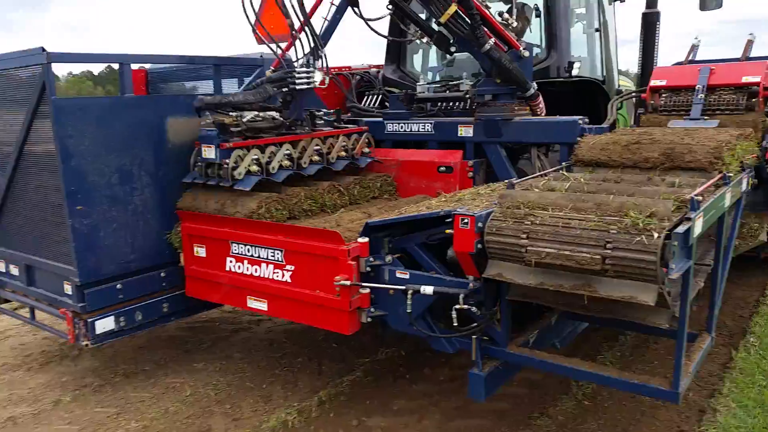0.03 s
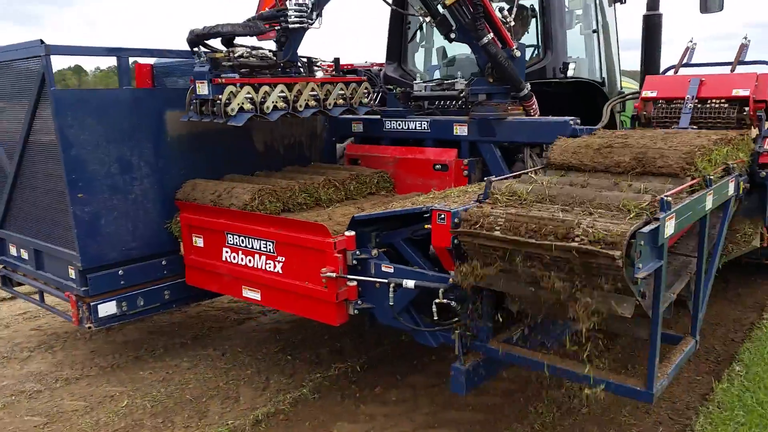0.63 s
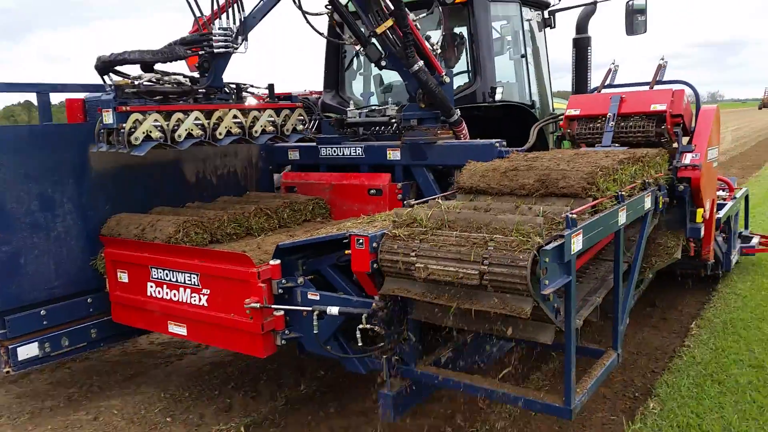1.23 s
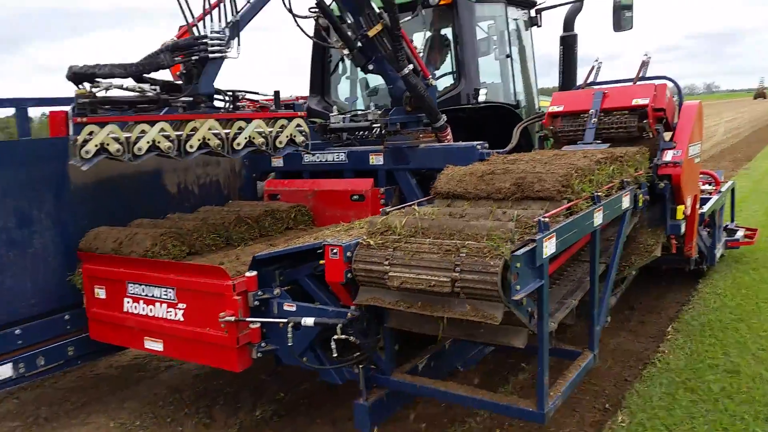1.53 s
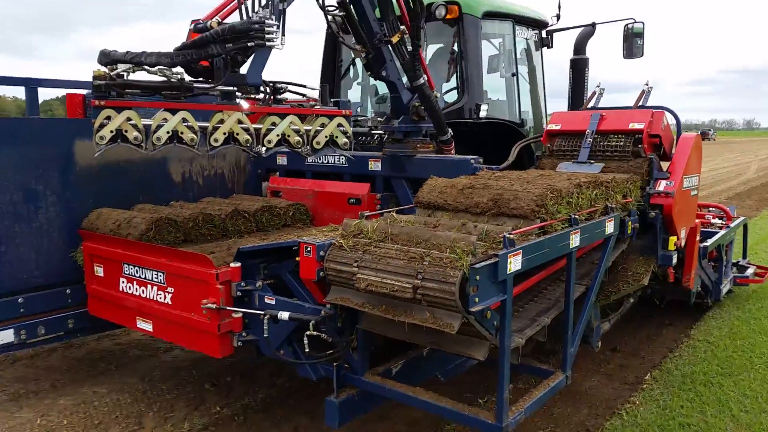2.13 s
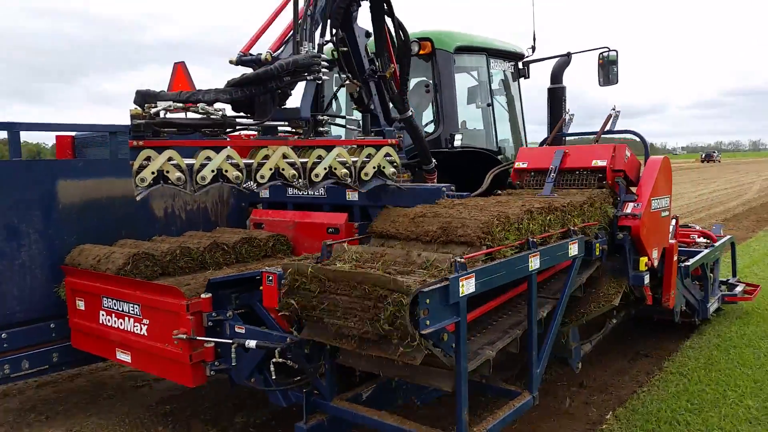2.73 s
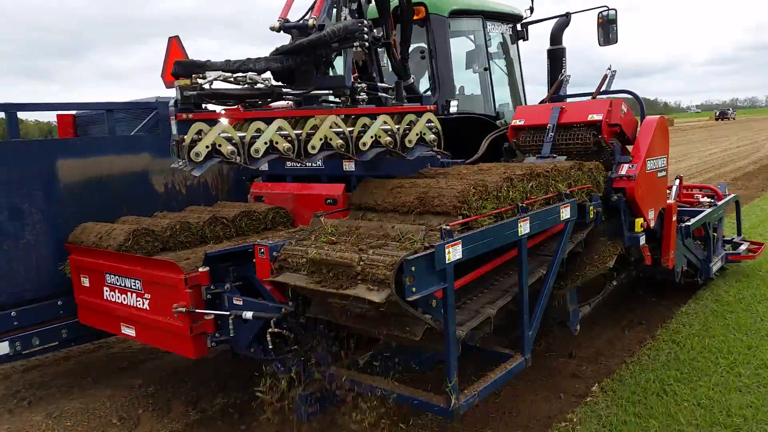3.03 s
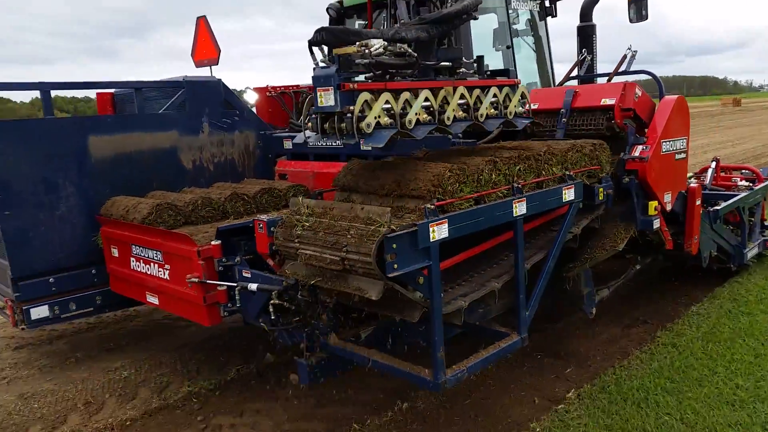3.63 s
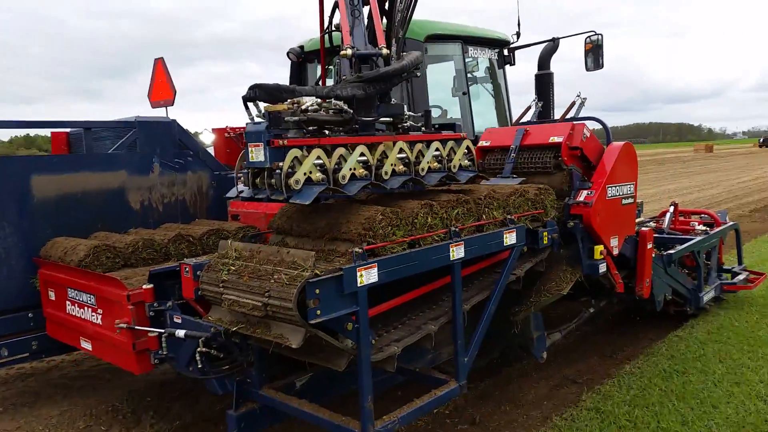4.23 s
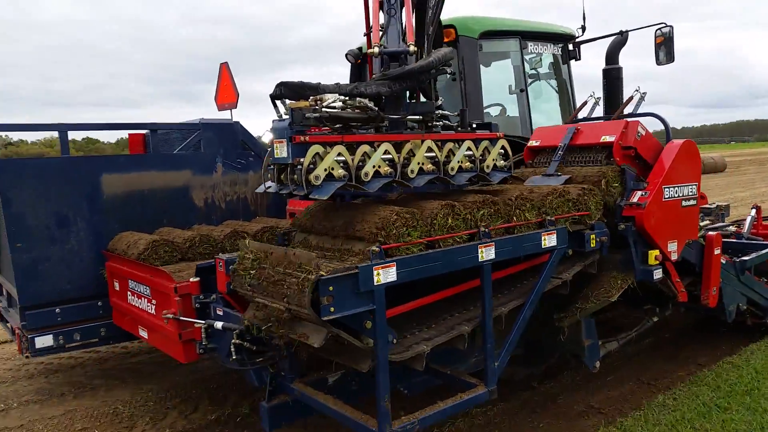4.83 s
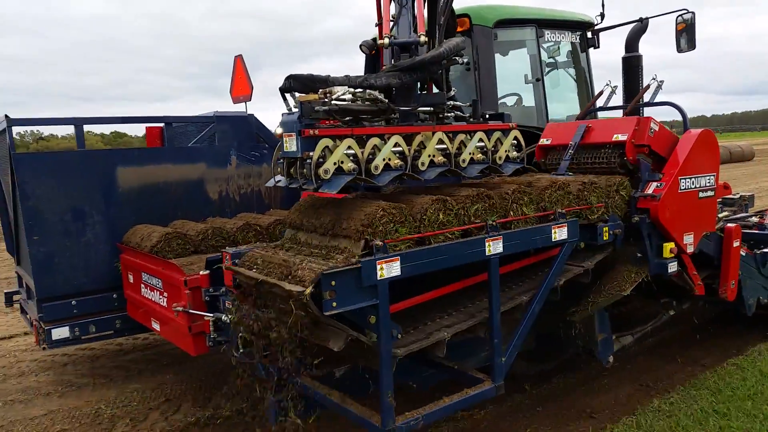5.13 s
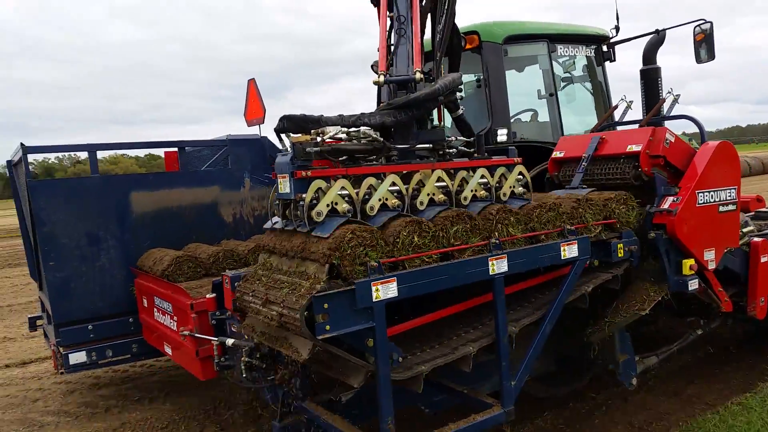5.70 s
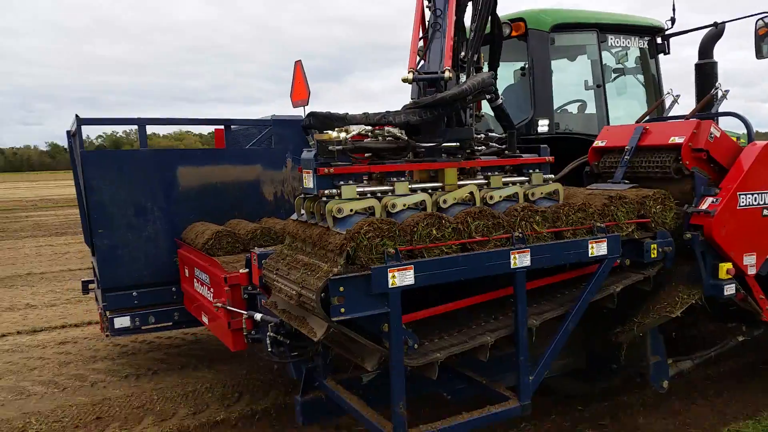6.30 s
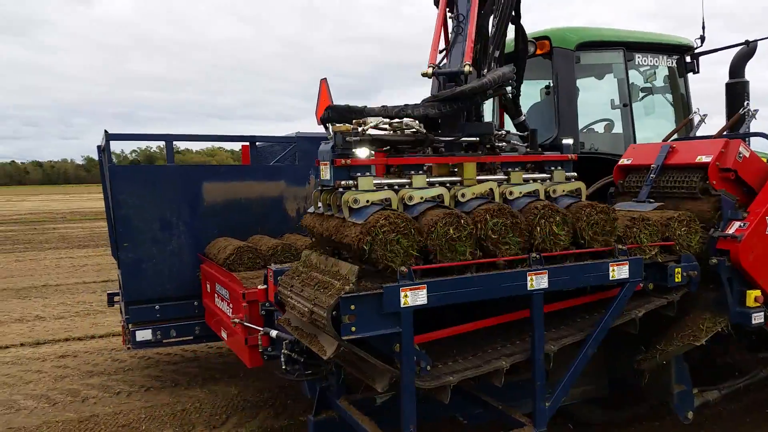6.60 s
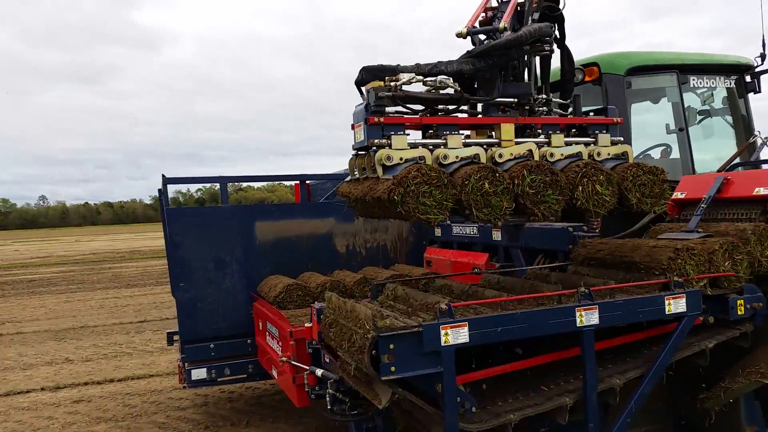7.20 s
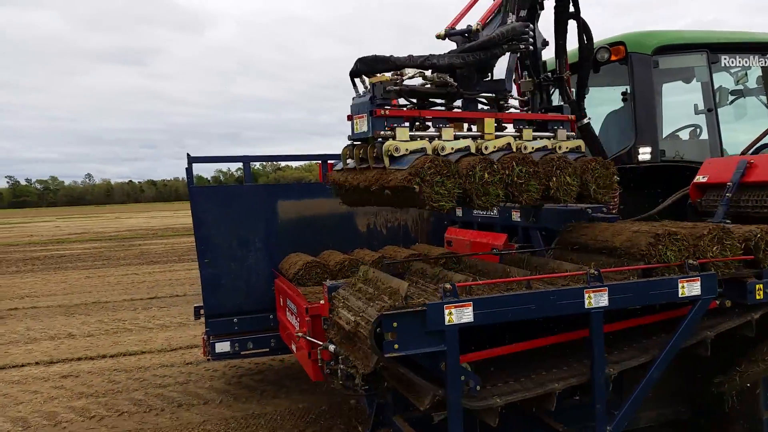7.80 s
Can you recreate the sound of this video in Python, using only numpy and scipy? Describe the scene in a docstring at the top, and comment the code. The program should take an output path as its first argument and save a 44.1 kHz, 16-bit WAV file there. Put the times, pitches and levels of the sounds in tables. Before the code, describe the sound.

A tractor-mounted sod harvester runs in an open field, a few metres from stereo microphones. It opens with a low diesel drone and a steel clank. At about 1 second the din swells: steady engine, pump hum with a thin whine, and a rumbling, rattling, hissing conveyor. The stacking arm clanks irregularly, with short high squeaks and gritty scrapes. Sod rolls thud on a sheet-steel table at about 2.7 and 4.7 seconds, and faint valve tones sound between 3 and 4. From 4.5 seconds a chain ticks in quick runs while the table booms softly. Light wind bumps the microphones twice. At 6.3 seconds everything sinks suddenly around a brief, very high squeal on the right and a sharp clank. Faint soil patter, a soft thud and light ticks follow. From about 7.5 seconds the drone, rattle and clanks return until the end at 8.

```python
"""A diesel drone and a steel clank open the scene: a sod harvester on a tractor, in an open field,
a few metres from a stereo pair of microphones. The engine holds governed speed under its pump's hum.
The conveyor rumbles and rattles, its chain ticks over a sprocket, sod rolls thud on a sheet-steel table
and the stacking arm clanks and squeaks. The whole din swells after a second, sinks suddenly around
a thin squeal, and comes back near the end."""
import sys
import numpy as np
from scipy import signal
from scipy.fft import rfft, irfft, next_fast_len
from scipy.io import wavfile
from scipy.ndimage import map_coordinates

SR = 44100
rng = np.random.default_rng(int(sys.argv[2]) if len(sys.argv) > 2 else 0)


def store_wav(level_fs):
    """Save 16-bit WAV to argv[1]."""
    pcm = np.round(np.clip(np.atleast_2d(level_fs), -1, 1) * 32767)
    wavfile.write(sys.argv[1], SR, pcm.T.astype(np.int16))


N = 350595

# wind on the microphones, spills of soil, the table under load: (middle [s], length [s], level [dB])
WIND_PUFFS = [(2.61, .09, -24), (5.8, .16, -28)]
SOIL_SPILLS = [(6.76, .14, -42), (6.84, .06, -47), (6.91, .07, -46), (7.12, .07, -44), (7.26, .2, -47)]
TABLE_LOADED = [(5.3, 1.6, -29)]
# noise spectra of the machine's parts: (frequency [Hz], relative density [dB])
CRUMB_SPECTRUM = [(450, -20), (950, 0), (1700, -2), (2900, -6), (4500, -13), (9000, -24)]
BOOM_SPECTRUM = [(200, -54), (320, 4), (395, 0), (480, -1.5), (580, -17), (1000, -61)]
TICK_SPECTRUM = [(3000, -68), (6300, -17), (7600, 6), (9300, 5), (11000, 12.5), (12500, 13), (14500, -0.5)]
RUMBLE_SPECTRUM = [(20, -30), (32, -11), (45, -12), (85, 2), (130, -3), (190, -3), (260, -2.5), (340, -4),
                   (480, -10), (560, -18), (800, -13.5), (1500, -39)]
RATTLE_SPECTRUM = [(250, -19), (520, 0), (720, -2), (950, 4), (1200, -0.5), (1900, -4.5), (2900, -7),
                   (3600, -21), (4800, -17.5), (5800, -19), (8000, -18), (14000, -54)]
HISS_SPECTRUM = [(2000, 8), (4000, 0.5), (5700, -9), (6800, -3), (8000, 2), (9500, 0), (11000, 2.5),
                 (12800, 7.5), (13700, 5), (14600, -0.5)]
KNOCK_SPECTRUM = [(250, -30), (400, 0), (560, -5), (720, -4), (950, 0), (1300, -3), (2000, -8), (3500, -25),
                  (6000, -50)]
# whine, hiss, rattle and drone as heard, swelling and sinking: (time [s], level [dB])
WHINE_LEVEL = [(0, -47), (.7, -58), (.95, -41), (1.3, -41), (1.7, -49), (3.1, -45), (3.6, -41.5),
               (4.2, -45), (5.2, -38), (6.15, -45), (6.35, -60), (7.3, -55), (7.7, -47)]
HISS_LEVEL = [(0, -37.5), (.6, -41.5), (.9, -34), (1.1, -28), (1.9, -31), (2.6, -25), (3.8, -26),
              (4.05, -32), (4.6, -26), (4.8, -20.5), (5.1, -25), (6.2, -25), (6.35, -39), (6.6, -44),
              (7.1, -40), (7.4, -37.5), (7.7, -25.5), (7.95, -26.5)]
RATTLE_LEVEL = [(0, -38.5), (.62, -42.5), (.78, -38.5), (.88, -35.5), (1.15, -31), (1.4, -31), (1.95, -31),
                (2.5, -30.5), (2.72, -26), (3.1, -30.5), (3.6, -29.5), (4.1, -34.5), (4.7, -30.5),
                (6.15, -28.5), (6.25, -33), (6.33, -46.5), (7.35, -43), (7.6, -31.5), (7.95, -31.5)]
DRONE_LEVEL = [(0, -34), (.86, -29.5), (.95, -22), (1.2, -17.5), (1.6, -20), (2.7, -21.5), (3.15, -18.3),
               (3.8, -22), (4.2, -26.5), (4.7, -21.5), (5.35, -20.5), (6.1, -20.5), (6.25, -24.5),
               (6.34, -39.5), (7.3, -36), (7.6, -25.5), (7.8, -25.5), (7.95, -23)]
# singing valves, drags over steel, dry pivots: (middle [s], length [s], pitch [Hz], relative level [dB])
VALVE_TONES = [(3.3, 0.81, 657, -40), (3.85, .6, 897, -42.5)]
DRAGS = [(2.655, 0.074, 760, -26), (2.81, .07, 1850, -31), (2.865, .04, 850, -28),
         (2.906, 0.058, 1710, -25.5), (2.932, .035, 810, -29), (3.19, .1, 1700, -33.5),
         (3.265, .04, 1950, -28), (3.45, .025, 856, -27.5), (3.56, .09, 800, -30),
         (4.307, 0.05, 2300, -27.5), (4.565, .05, 1500, -29.5), (4.81, .12, 1900, -45),
         (5.025, .03, 980, -29), (5.06, .07, 1750, -31), (5.522, .04, 2300, -28)]
PIVOT_SQUEAKS = [(1.38, .049, 6200, -37), (1.396, .065, 12700, -31), (1.769, .055, 5740, -39),
                 (2.032, .029, 7780, -37), (2.516, .07, 6160, -37.5), (4.114, .04, 9350, -41),
                 (4.146, .027, 9550, -36), (4.384, .042, 5630, -41), (4.827, .07, 12750, -29),
                 (5.881, .028, 5500, -34), (5.923, .035, 5520, -41), (6.213, .022, 5520, -30),
                 (6.225, .013, 5560, -22.5), (6.241, .02, 5500, -40)]
# the gripper closing: (start [s], end [s], first pitch [Hz], last pitch [Hz], level [dB])
GRIPPER_CHIRPS = [(6.268, 6.332, 13050, 13500, -28), (6.295, 6.318, 12250, 12400, -33),
                  (6.315, 6.336, 14150, 14400, -18), (6.336, 6.358, 13800, 14450, -17),
                  (6.355, 6.385, 14200, 14050, -19), (6.362, 6.394, 13000, 12850, -27),
                  (6.370, 6.392, 10600, 10650, -34), (6.370, 6.392, 9720, 9760, -36),
                  (6.385, 6.412, 14000, 14130, -12), (6.405, 6.430, 14200, 14520, -17)]
# runs of chain ticks: (first [s], last [s], ticks [count], level [dB], loudest point [share of run],
# left-right [dB])
TICK_RUNS = [(4.471, 4.558, 3, -21.5, 0.44, 4), (4.795, 5.009, 6, -23.5, 0.35, -2),
             (5.169, 5.376, 6, -19, 0, 0), (5.538, 5.705, 5, -15.5, 0.84, 2), (5.747, 5.747, 1, -23, 0, 2),
             (5.9365, 5.9365, 1, -19.5, 0, -2), (6.671, 7.018, 8, -36.5, .6, -11),
             (7.058, 7.235, 5, -29.5, 1, -6), (7.432, 7.515, 3, -27, 0.95, -9),
             (7.635, 7.676, 2, -23.5, 0.76, -9), (7.76, 7.917, 5, -25, 0.52, -8)]
# sod rolls landing: (time [s], level [dB], pitch [Hz], relative slap [dB], t60 [s])
ROLL_LANDINGS = [(2.718, -14, 295, -5, .07), (2.728, -14, 320, -3, .08), (4.706, -10, 310, -6, .055),
                 (6.783, -27, 330, -14, .09)]
# modes of the sheet-steel table: (frequency [multiple of the pitch], level [dB])
TABLE_MODES = [(1, 0), (1.5, -7), (2.45, -11), (3, -11), (4.4, -19)]
# where the conveyor sits between the microphones: (time [s], rattle left-right [dB], hiss left-right [dB])
CONVEYOR_BEARING = [(0, -1.5, -5), (2.4, -2.5, -5), (3.2, -2.5, 0), (4.3, -1, 2.5), (5.1, -0.5, 2),
                    (6.1, 4, 1), (6.5, 8, -1.5), (7.95, 15, -3)]
# how the two microphones colour the conveyor: (frequency [Hz], left-right [dB])
MIC_SHADING = [(60, -0.5), (150, 2), (320, 7.5), (600, 3.5), (1000, 6), (1500, 5), (2500, 2.5),
               (4500, -6.5), (7000, 9), (9000, 22), (11000, -5), (13000, -7.5)]
# steel knocking on steel: (time [s], level [dB], pitch of the struck spot [Hz], relative body [dB],
# body pitch [Hz], relative treble [dB], t60 [s], left-right [dB])
ARM_BLOWS = [(0.017, -28.5, 3720, -14, 1800, -15, 0.28, -4), (0.068, -37, 4000, -10, 1800, -12, .14, -4),
             (0.370, -33, 4200, -12, 1800, -16, 0.13, -5), (1.097, -27.5, 3100, 3, 2300, -8, .16, -1),
             (1.375, -19.5, 5000, -5, 1500, -8, 0.16, -7), (1.4116, -25.5, 4450, -2, 1500, -7, .21, -3),
             (1.638, -38, 3000, 12, 1270, -14, .12, 2), (2.031, -24, 3000, 1, 1500, -7, .18, -4),
             (2.129, -21.5, 4500, -0.5, 1270, -18, .13, -3), (2.2925, -17.5, 4150, 2, 2800, -11, 0.19, -4),
             (2.515, -23.5, 5370, -16, 1800, -6, 0.22, -6), (2.536, -25.5, 4400, -18, 1800, -4, 0.17, -4),
             (2.63, -22, 3930, -16, 1800, -4.5, 0.16, -1), (3.001, -18, 5000, 1.5, 1700, -19, 0.11, -1),
             (3.352, -25.5, 2900, 6, 1800, -3, .13, 0), (3.519, -26.5, 3000, 2, 2600, -12, 0.14, 0),
             (3.6443, -14, 6700, -4, 970, -5, 0.12, 1), (3.674, -23, 4600, -4, 1500, -12, .12, -4),
             (3.793, -33, 3000, 10, 1900, -12, .1, 0), (4.733, -22.5, 3700, 5, 1400, -2, .17, 1),
             (4.9068, -24, 3020, -3, 1000, -1, .12, 2), (5.137, -23, 4100, 4, 1500, -14, 0.19, 2),
             (5.229, -21, 2880, 4, 1200, -3, .14, 2), (5.304, -20, 3600, 1.5, 950, -8, 0.098, 2),
             (5.404, -21, 3060, 9.5, 1800, -17, 0.11, 4), (5.9833, -14.5, 3750, 2.5, 930, -5, 0.14, 2),
             (6.012, -20, 2960, 2, 1000, -3, 0.21, 0), (6.098, -27.5, 3000, 8, 1700, -6, 0.12, 2),
             (6.1852, -25.5, 5000, -4, 1500, 1.5, 0.21, 6), (6.332, -30, 3870, -10, 1800, 5.5, .072, 3),
             (6.438, -17, 3300, -12, 2700, 3.5, 0.018, 2), (6.446, -26.5, 3100, -7, 2700, 3, 0.087, 5),
             (6.629, -37, 3050, -12, 1800, -14, .071, -1), (6.7322, -43, 2900, 13, 1300, -6, 0.2, 10),
             (6.8947, -36, 3800, 4, 1300, -2, .14, 3), (7.555, -26, 2700, 3, 1000, -17, .17, 0),
             (7.711, -16.5, 2600, 2, 2400, -15, 0.084, 3), (7.762, -25, 3300, -2, 950, 9, 0.03, 4),
             (7.8088, -19.5, 2850, 2.5, 2600, -20, 0.12, 0), (7.883, -25.5, 2860, -1, 1000, -3, .17, 1),
             (7.899, -21.5, 2860, 0, 2400, -10, 0.14, 3)]
# modes of the stacking arm: (frequency [Hz], width [Hz], level [dB])
ARM_MODES = [(2780, 470, 6.5), (3020, 77, 10), (3470, 290, -4.5), (3810, 230, -2.5), (4360, 170, 0.5),
             (5060, 52, 6.5), (5600, 120, -3.5), (6120, 90, 2.5), (6960, 170, 1.5), (7430, 280, -8),
             (12750, 90, 0)]
# modes of the frame under the arm: (frequency [Hz], level [dB], t60 [multiple of the blow's])
FRAME_MODES = [(928, -0.5, 1.2), (1034, -8, 1.1), (1257, -5.5, 1.3), (1680, -4, 1.3), (1884, -3.5, 1.5),
               (2020, -4, 1), (2670, 2, .9), (3120, 6, .9)]
# governed crankshaft: (time [s], speed [turns/s])
CRANK_SPEED = [(0, 26.41), (3.9, 26.4), (4.6, 26.25), (5, 26.52), (5.5, 26.41), (7.95, 26.37)]
# tones locked to the shaft: (order [multiple of crank speed], level [dB])
ENGINE_ORDERS = [(2, -10.5), (3, -24), (4, 0), (5, -23), (6, -9.5), (7, -18), (8, -7.5), (10, -21),
                 (16, -20)]
PUMP_ORDERS = [(9, 0), (11.35, -11), (18, -27), (36, -31), (40.3, -30)]
# the drone as heard ducks briefly, mostly at loud clanks: (time [s])
DRONE_DUCKS = [0.85, 1.08, 1.39, 1.95, 2.54, 3.65, 4.73, 5.98]
# the low drone throbs: (time [s], level change [dB])
DRONE_THROBS = [(2.67, -8), (2.84, -6), (2.93, 3), (3.01, -9), (5.33, 3), (5.43, -9), (5.52, 6), (5.60, -8),
                (7.70, -8)]


def amp(db):
    """Decibels to gain."""
    return 10 ** (np.asarray(db) / 20)


def unit(x):
    """Scale to rms 1."""
    return x / np.sqrt(np.mean(x ** 2) + 1e-20)


def along(points, hz):
    """Read (Hz, value) points on a log axis."""
    freqs, values = np.transpose(points)
    return np.interp(np.log(hz + 1), np.log(freqs + 1), values)


def curves(rows):
    """One value per sample for each column after the time."""
    times, *columns = np.transpose(rows)
    return [np.interp(np.arange(N) / SR, times, column) for column in columns]


def swells(rows):
    """Envelope of smooth humps from (middle [s], length [s], level [dB]) rows."""
    t = np.arange(N) / SR
    return sum(amp(db) * np.exp(-(2 * (t - s) / length) ** 2) for s, length, db in rows)


def wobble(rate):
    """A smooth random curve, rate knots a second."""
    knots = rng.standard_normal(int(N * rate / SR) + 4)
    fine = np.arange(0, len(knots) - 1, 1 / 8)
    return np.interp(np.arange(N) * rate / SR, fine, map_coordinates(knots, [fine]))


def filtered(x, response):
    """x times a response of frequency."""
    n = x.shape[-1]
    padded = next_fast_len(n + 4096, True)
    return irfft(rfft(x, padded) * response(np.fft.rfftfreq(padded, 1 / SR)), padded)[..., :n]


def coloured(x, spectrum):
    """x shaped by (Hz, dB) points, at rms 1."""
    return unit(filtered(x, lambda hz: amp(along(spectrum, hz))))


def panned(x, pan_db):
    """Left louder than right by pan_db, at constant power."""
    gains = np.array([amp(pan_db / 2), amp(-pan_db / 2)]).reshape(2, -1)
    return x * gains / np.sqrt(np.mean(gains ** 2, axis=0))


def arriving(x, lead_ms):
    """A direct sound that reaches the left microphone lead_ms before the right."""
    return filtered(x, lambda hz: np.exp(1j * np.pi * hz * lead_ms / 1000 * np.array([[1], [-1]])))


def noise_pair(alike, lead_ms):
    """White noise at the two microphones: a direct share and a scattered rest."""
    direct = arriving(rng.standard_normal(N), lead_ms)
    return np.sqrt(alike) * direct + np.sqrt(1 - alike) * rng.standard_normal((2, N))


def add(track, s, sound):
    """Mix a sound in at time s."""
    room = track[:, max(round(s * SR), 0):][:, :sound.shape[-1]]
    room += sound[..., :room.shape[-1]]


def jostle(rate, t60, spread_db):
    """Envelope of many small random contacts, each dying quickly."""
    blows = (rng.random(N) < rate / SR) * amp(spread_db * np.clip(rng.standard_normal(N), -2, 2))
    t = np.arange(SR // 8) / SR
    power = signal.fftconvolve(blows ** 2, amp(-60 * t / t60) ** 2)[:N]
    return unit(np.sqrt(np.abs(power)))


def noise_cycle():
    """One period of noise; repeated, it gives an even comb of lines."""
    return irfft(np.exp(2j * np.pi * rng.random(size=800)))


def hum(turns, orders, waver_db, drift):
    """Lines locked to the shaft; the higher ones waver more in level and phase."""
    lines = np.zeros(N)
    for order, db in orders:
        unsteady = max(1, order / 9)
        phase = 2 * np.pi * (order * turns + rng.random()) + unsteady * drift * wobble(12)
        lines += np.sqrt(2) * amp(db + unsteady * waver_db * wobble(9)) * np.sin(phase)
    return lines


def wind():
    """Light puffs bump each microphone port on its own."""
    spectrum = [(12, -18), (30, -9), (70, -12), (200, -45), (1000, -90)]
    return panned(swells(WIND_PUFFS) * coloured(rng.standard_normal((2, N)), spectrum), pan_db=6)


def soil():
    """Crumbs fall from the lifted rolls and patter on the conveyor."""
    patter = jostle(rate=260, t60=.014, spread_db=4) * noise_pair(alike=.45, lead_ms=-.2)
    return panned(swells(SOIL_SPILLS) * coloured(patter, CRUMB_SPECTRUM), pan_db=-1)


def hydraulics(turns, whine_order=27):
    """The pump whines thinly with the shaft; valves sing as the arm swings."""
    t = np.arange(N) / SR
    whine_db = curves(WHINE_LEVEL)[0] + wobble(8)
    whine = amp(whine_db) * np.sin(2 * np.pi * whine_order * turns + .2 * wobble(8))
    valves = sum(swells([(s, length, db)]) * np.sin(2 * np.pi * hz * t + .5 * wobble(15))
                 for s, length, hz, db in VALVE_TONES)
    return arriving(np.sqrt(2) * (whine + valves), lead_ms=-.1)


def table_boom(links_per_s=24.9, link_share=.55):
    """Under a full row of rolls the sheet-steel table booms, shaken alike by every link of the chain."""
    cycle = noise_cycle()
    links = np.arange(N) / SR * links_per_s + .02 * wobble(5)
    beat = unit(cycle[(links % 1 * len(cycle)).astype(int)])
    shaking = np.sqrt(link_share) * beat + np.sqrt(1 - link_share) * noise_pair(alike=1, lead_ms=-.065)
    load = swells(TABLE_LOADED) * amp(2.3 * wobble(18))
    return panned(load * coloured(shaking, BOOM_SPECTRUM), pan_db=8.5)


def scrapes(half_width_octaves=.25):
    """Sod and slats drag over steel: a cluster of coarse catches sounds around one pitch."""
    out, t = np.zeros((2, N)), np.arange(N) / SR
    grit = noise_pair(alike=.7, lead_ms=-.18) * jostle(rate=320, t60=.014, spread_db=4)
    for s, length, hz, db in DRAGS:
        near = np.abs(t - s) < length
        band = lambda f: amp(-6 * (np.log2((f + 1) / hz) / half_width_octaves) ** 2)
        drag = unit(filtered(grit[:, near], band))
        add(out, s - length, amp(db) * drag * np.exp(-(2 * (t[near] - s) / length) ** 2))
    return panned(out, pan_db=2)


def squeaks(pitch_stray=.016, scrape_db=-9):
    """Dry pivots stick and slip in short rough chirps with one overtone and a faint scrape."""
    out, t = np.zeros((2, N)), np.arange(N) / SR
    stray = np.cumsum(wobble(2500)) / SR
    grip = unit(amp(3.5 * wobble(260)))
    for s, length, hz, db in PIVOT_SQUEAKS:
        near = np.abs(t - s) < length / 2
        phase = 2 * np.pi * hz * (t[near] + pitch_stray * stray[near])
        tone = arriving(np.sin(phase) + amp(-5) * np.sin(2 * phase), lead_ms=-.2)
        scrape = unit(filtered(rng.standard_normal(tone.shape), lambda f: 1 / (1 + ((f - hz) / 900) ** 2)))
        swell = np.cos(np.pi * (t[near] - s) / length) * grip[near]
        add(out, s - length / 2, amp(db + 4) * swell * (tone + amp(scrape_db) * scrape))
    return out


def gripper_squeal(stray_hz=110, flutter_db=3):
    """Off to the right the gripper takes hold and slips in very high, fluttering chirps, most rising."""
    out = np.zeros((2, N))
    stray = 2 * np.pi * np.cumsum([stray_hz * wobble(900) for side in range(2)], axis=1) / SR
    flutter = amp(flutter_db * np.tanh(wobble(400)))
    for start, end, start_hz, end_hz, db in GRIPPER_CHIRPS:
        span = np.arange(round(start * SR), round(end * SR))
        phase = 2 * np.pi * np.cumsum(np.linspace(start_hz, end_hz, len(span))) / SR + stray[:, span]
        add(out, start, amp(db) * np.sqrt(np.hanning(len(span))) * flutter[span] * np.sin(phase))
    return panned(out, pan_db=-9)


def chain(sag_db=5.5, thin_below_db=-21, rebound_s=.014, rebound_db=-9):
    """Link after link scrapes onto the sprocket and rebounds; the frame scatters each tick."""
    out, t = np.zeros((2, N)), np.arange(SR // 10) / SR
    envelope = (1 - np.exp(-t / .0003)) * (np.exp(-(t / .0062) ** 4) + .27 * amp(-60 * t / .11))
    for first, last, links, peak_db, crest, pan_db in TICK_RUNS:
        for share in np.linspace(0, 1, round(links)):
            s = first + share * (last - first)
            db = peak_db - sag_db * (share - crest) ** 2 + rng.normal()
            # light ticks keep only their highest part
            thin_db = np.clip((thin_below_db - db) * 2, 0, 10)
            spectrum = [(hz, level - thin_db * (hz < 10000)) for hz, level in TICK_SPECTRUM]
            rebound = (rebound_s * rng.uniform(.7, 1.3), rebound_db + 2 * rng.normal())
            for delay, drop_db in [(0, 0), rebound]:
                tick = envelope * coloured(rng.standard_normal((2, len(t))), spectrum)
                add(out, s + delay, panned(amp(db + drop_db) * tick, pan_db))
    return out


def thuds(push_s=.005):
    """Heavy soft rolls drop on the sheet-steel table: its low modes boom briefly under a flat slap."""
    out, t = np.zeros((2, N)), np.arange(SR // 3) / SR
    slap_spectrum = [(400, -18), (700, 0), (900, -2), (1400, -10), (4000, -28)]
    for s, db, hz, slap_db, t60 in ROLL_LANDINGS:
        boom = sum(amp(level + rng.normal()) * np.sin(2 * np.pi * (ratio * hz * t + rng.random()))
                   for ratio, level in TABLE_MODES)
        slap = coloured(rng.standard_normal(len(t)), slap_spectrum)
        fade = (1 - np.exp(-t / .003)) * amp(-60 * np.maximum(t - push_s, 0) / t60)
        add(out, s, amp(db) * (boom + amp(slap_db - 3) * slap) * fade)
    return panned(out, pan_db=4.5)


def slat_knocks(per_s=7, relative_db=-1, hz=2720):
    """Slats knock at random, louder when the rattle is louder; rows as in ARM_BLOWS."""
    rattle_db = curves(RATTLE_LEVEL)[0]
    knocks = []
    for when, force, spot in rng.random((int(per_s * N / SR), 3)):
        db = rattle_db[int(when * N)] + relative_db + 6 * (force - .5)
        spot_hz = hz * 2 ** (spot - .5)
        knocks.append((when * N / SR, db, spot_hz, 0, spot_hz / 2, -6, .09, 0))
    return knocks


def frame_ring(t, body_hz, t60, fall_db_per_octave=12):
    """The frame's modes near the body pitch of a blow ring out."""
    hz, db, life = np.transpose(FRAME_MODES)[:, :, None]
    sizes = amp(db + rng.normal(0, 1.4, hz.shape) - fall_db_per_octave * np.abs(np.log2(hz / body_hz)))
    cycles = hz * (1 + .006 * rng.standard_normal(hz.shape)) * t + rng.random(hz.shape)
    ring = np.sum(sizes * np.sin(2 * np.pi * cycles) * amp(-60 * t / (t60 * life)), axis=0)
    attack = 1 - np.exp(-t / .0006)
    return arriving(ring * attack / np.sqrt(np.sum(sizes ** 2) / 2), lead_ms=-.15)


def arm_ring(noise, spot_hz, fall_db_per_octave=12.6, mode_stray=.015):
    """The struck spot picks out the arm's modes near its pitch; the load shifts them a little."""
    sizes = [amp(db + 2 * rng.normal() - fall_db_per_octave * abs(np.log2(hz / spot_hz)))
             for hz, width, db in ARM_MODES]
    shift = 1 + mode_stray * rng.normal()

    def modes(f):
        return sum((-1) ** k * sizes[k] * 1j * f * width / ((shift * hz) ** 2 - f * f + 1j * f * width)
                   for k, (hz, width, db) in enumerate(ARM_MODES))
    return unit(filtered(noise, modes))


def clanks(clatter_db=-5.5):
    """Blows ring the damped steel arm with a loose clatter and a bright crack; the frame thumps below."""
    out, t = np.zeros((2, N)), np.arange(SR // 3) / SR
    thump_spectrum = [(300, -27), (850, 0), (1800, 1), (3500, -21)]
    crack_spectrum = [(5500, -3), (8200, 9.5), (11000, 6.5), (13000, 16.5), (14500, 5.5)]
    for s, db, hz, body_db, body_hz, treble_db, t60, pan_db in ARM_BLOWS + slat_knocks():
        ring_noise, thump_noise, crack_noise, clatter_noise = rng.standard_normal((4, 2, len(t)))
        clatter = unit(filtered(clatter_noise, lambda f: amp(-26 * np.log2((f + 1) / hz) ** 2)))
        ring = unit(arm_ring(ring_noise, hz) + amp(clatter_db) * clatter)
        thump = amp(body_db - 5) * coloured(thump_noise, thump_spectrum)
        crack = amp(treble_db + 7) * coloured(crack_noise, crack_spectrum)
        # a hard first contact, then the ring dies away
        fade = (1 - np.exp(-t / .00028)) * (1 + .5 * np.exp(-t / .00084)) * amp(-60 * t / t60)
        body = amp(body_db - 4) * frame_ring(t, body_hz, t60)
        add(out, s, panned(amp(db - 4) * (fade * (ring + thump + crack) + body), pan_db))
    return out


def conveyor(turns, rumble_over_rattle_db=8):
    """The frame's rumble swells and sinks with the rattle of slats and crumbs; belts and oil lines hiss."""
    waver_db = .92 * wobble(12)
    rattle_db = curves(RATTLE_LEVEL)[0] + waver_db
    rumble_db = rattle_db + rumble_over_rattle_db + wobble(16)
    hiss_db = curves(HISS_LEVEL)[0] + waver_db
    rumble = amp(rumble_db) * coloured(noise_pair(alike=.97, lead_ms=-.077), RUMBLE_SPECTRUM)
    # every firing, two a turn, shakes the loose parts
    shake = amp(.16 * np.sin(2 * np.pi * 2 * turns))
    contacts = jostle(rate=650, t60=.04, spread_db=3.6) * shake
    rattle = amp(rattle_db) * coloured(noise_pair(alike=.5, lead_ms=-.18) * contacts, RATTLE_SPECTRUM)
    sizzle = noise_pair(alike=.02, lead_ms=-.21) * jostle(rate=900, t60=.2, spread_db=9.5)
    hiss = amp(hiss_db) * coloured(sizzle, HISS_SPECTRUM)
    rattle_pan, hiss_pan = curves(CONVEYOR_BEARING)
    din = rumble + panned(rattle, rattle_pan) + panned(hiss, hiss_pan)
    return filtered(din, lambda hz: panned(.84, along(MIC_SHADING, hz)))


def tractor(turns, duck_db=8.5, half_width_s=.03, full_drone_db=-22.5, knock_db=-11.5):
    """Near the middle of the pair: low diesel orders, combustion knock and the nine-piston pump."""
    t = np.arange(N) / SR
    bump = lambda s: np.exp(-((t - s) / half_width_s) ** 2)
    drone_db = curves(DRONE_LEVEL)[0] - duck_db * sum(bump(s) for s in DRONE_DUCKS)
    engine_db = drone_db + sum(db * bump(s) for s, db in DRONE_THROBS) + 1.1 * wobble(13)
    # the pump's hum follows a little below the drone
    pump_db = full_drone_db - 4.5 + .99 * (drone_db - full_drone_db) + 1.9 * wobble(12)
    engine = amp(engine_db) * hum(turns, ENGINE_ORDERS, waver_db=1.1, drift=.017)
    pump = amp(pump_db) * hum(turns, PUMP_ORDERS, waver_db=.7, drift=.06)
    # the block gives the same burst of knocks on every turn
    cycle = noise_cycle()
    bursts = cycle[(turns % 1 * len(cycle)).astype(int)]
    knock = amp(curves(RATTLE_LEVEL)[0] + knock_db) * coloured(bursts, KNOCK_SPECTRUM)
    return (panned(arriving(engine, lead_ms=-.43), pan_db=1)
            + panned(arriving(pump + knock, lead_ms=-.044), pan_db=2))


def scene():
    """The whole machine from a few metres away, in the open field."""
    turns = np.cumsum(curves(CRANK_SPEED)[0]) / SR
    running = tractor(turns) + hydraulics(turns) + conveyor(turns) + chain() + table_boom()
    return running + clanks() + thuds() + scrapes() + squeaks() + gripper_squeal() + soil() + wind()


def record(dry):
    """The recorder keeps nothing above its band limit."""
    top_hz = 14620
    return filtered(dry, lambda hz: 1 / np.sqrt(1 + (hz / top_hz) ** 240))


dry = scene()
out = record(dry)
store_wav(out)
```